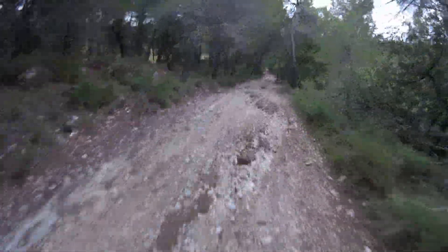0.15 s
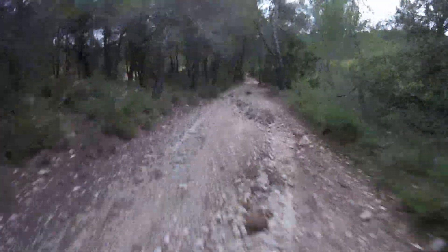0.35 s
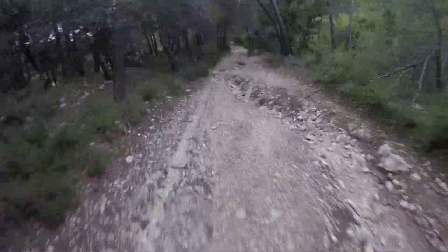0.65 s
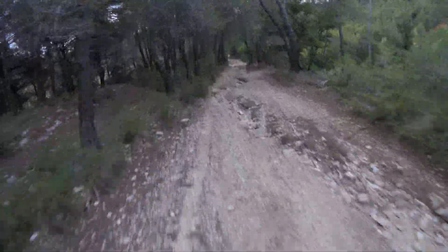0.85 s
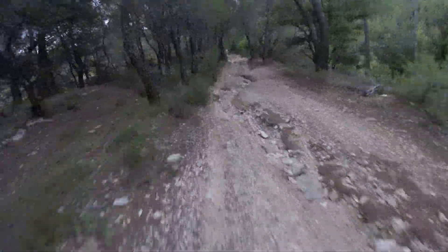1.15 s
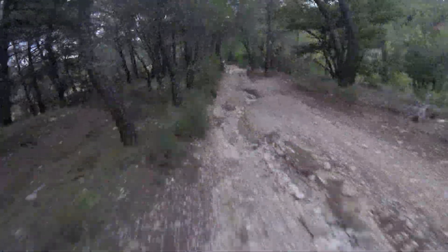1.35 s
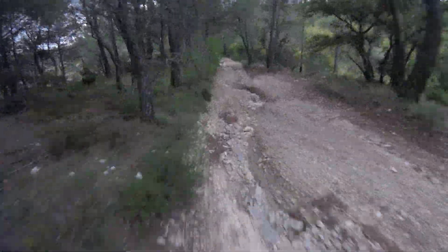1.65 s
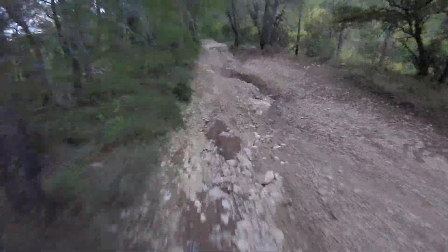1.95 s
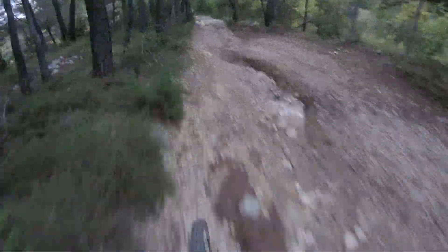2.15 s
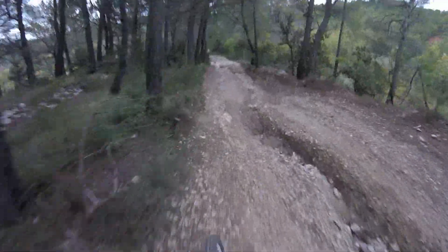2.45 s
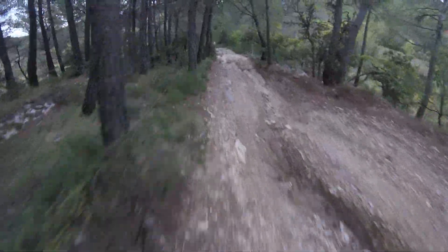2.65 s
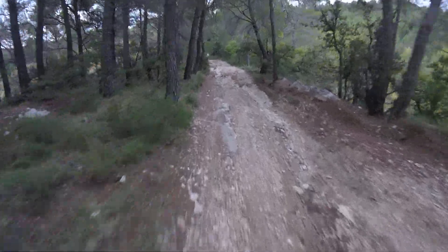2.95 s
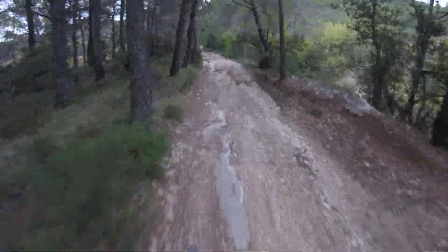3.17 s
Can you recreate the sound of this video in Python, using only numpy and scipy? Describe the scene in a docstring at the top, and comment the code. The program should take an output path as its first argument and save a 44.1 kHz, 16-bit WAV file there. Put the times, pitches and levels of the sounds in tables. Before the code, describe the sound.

Mountain bike tyres rumble quickly over stony dirt, under lumpy low wind buffeting, close and muffled at the rider, outdoors and dry. Stone clacks, gravel crunch and tiny high pebble pings cluster densely at 0.4-0.7 s, then come sparsely. At 2.08-2.14 s a hard double knock rings the bike briefly with rattling parts. The ride drops quieter, a short bright swish passes at 2.9 s, and rumble and wind rebuild until 3.3 s.

```python
"""Wind buffeting and tyre rumble come first: a mountain bike rolls fast down a stony track, heard from a case
on the rider. Filtered random impacts make the rumble, roar, crunch and grit; steadied noise makes the wind.
Stones and pebbles are decaying sines with noise bursts. Just after two seconds a hard double knock excites the
bike's modes and loose parts rattle; the sound drops quieter, then builds again with one short swish."""
import sys
import numpy as np
from scipy import signal
from scipy.fft import rfft, irfft
from scipy.io import wavfile
from scipy.ndimage import uniform_filter1d

SR = 44100
rng = np.random.default_rng(int(sys.argv[2]) if len(sys.argv) > 2 else 0)


def log_audio(samples):
    """Write samples as a 16-bit WAV file to the path given in sys.argv[1]."""
    # one column per channel
    frames = np.atleast_2d(samples).T
    # limit to full scale, then quantise
    limited = np.clip(frames, -1, 1)
    pcm = np.round(limited * 32767).astype(np.int16)
    wavfile.write(sys.argv[1], SR, pcm)


N = 145971
TIME = np.arange(N) / SR  # seconds

# Tyre rumble over time. Each row: time in seconds, level in dB before the trim.
RUMBLE_LEVEL = [(0,-27),(.15,-27.5),(.4,-23.5),(.49,-20.5),(.65,-25.5),(.69,-20.5),(.78,-20.5),(.9,-19.8),(1.2,-22),(1.41,-24.5),(1.47,-21.5),(1.54,-23),(1.84,-22.5),(1.98,-25),(2.04,-18.5),(2.09,-28),(2.17,-35.5),(2.27,-28.5),(2.45,-30),(2.55,-33),(2.64,-27.5),(2.98,-28),(3.31,-22.5)]
# Roar of the tread on the dirt over time. Each row: time in seconds, level in dB before the trim.
ROAR_LEVEL = [(0,-32.5),(.25,-30),(.42,-29.5),(.53,-24.5),(.6,-27.5),(.67,-30),(.86,-29.5),(.94,-34),(1.1,-31),(1.25,-34),(1.45,-31.5),(2.06,-31),(2.12,-39.5),(2.24,-38),(2.4,-41),(2.5,-43.5),(2.69,-41.5),(2.94,-33.5),(3.31,-32.5)]
# Spectrum of the wheels' thuds. Each row: frequency in Hz, relative density in dB per Hz.
RUMBLE_SPECTRUM = [(30,-20),(80,-6.5),(130,0.5),(200,-3.5),(310,-7.5),(450,-14),(700,-21),(1300,-46),(3000,-73.5)]
# Spectrum of the tread's roar, also of scraping stones. Each row: frequency in Hz, relative density in dB per Hz.
ROAR_SPECTRUM = [(200,-17.5),(450,-4.5),(720,-4),(880,0),(1000,-0.5),(1120,-7.5),(1270,-7.5),(1450,-14.5),(1650,-16),(1950,-29),(3000,-36.5),(6000,-75.5)]


def tyres():
    """Roughness excitation: random bumps thud through the wheels while the tread roars over the dirt."""
    bumps = grains(per_s=1500, spread_db=2.5)
    thuds = steady(colour(bumps, RUMBLE_SPECTRUM), size=5000)
    tread_impacts = grains(per_s=5000, spread_db=2.5) * amp(2.0 * wander(rate_hz=62))
    tread = steady(colour(tread_impacts, ROAR_SPECTRUM), size=6000)
    rumble = amp(-0.13) * level(RUMBLE_LEVEL) * thuds
    roar = amp(0.21) * level(ROAR_LEVEL) * tread
    return rumble + roar


# Gravel crunch over time. Each row: time in seconds, level in dB before the trim.
CRUNCH_LEVEL = [(0,-48.5),(.22,-43),(.46,-43),(.55,-37.5),(.62,-41.5),(.70,-45),(.8,-51.5),(.92,-54.5),(1.02,-54),(1.08,-48),(1.42,-48.5),(2.05,-47.5),(2.23,-55),(2.42,-50),(2.66,-53.5),(2.84,-50),(2.96,-48),(3.31,-43.5)]
# Fine grit thrown up by the tyres, over time. Each row: time in seconds, level in dB before the two grit trims.
GRIT_LEVEL = [(0,-59),(.22,-55.5),(.46,-52.5),(.52,-49),(.565,-40),(.6,-51.5),(.69,-51),(.8,-73),(1.2,-60.5),(1.43,-58.5),(1.8,-63.5),(2.06,-54),(2.3,-59),(2.8,-70),(3.0,-60.5),(3.31,-64)]
# Spectrum of cracking gravel and stones. Each row: frequency in Hz, relative density in dB per Hz.
STONE_SPECTRUM = [(300,-11),(900,2.5),(1600,4.5),(2000,-4.5),(2350,1.5),(2700,4.5),(3150,-5.5),(3600,2),(3950,-8),(4400,-20),(5100,-12.5),(6700,-11),(7300,-18),(8100,-24.5),(12000,-24.5),(13500,-42),(15500,-39)]
# Spectrum of grit and pebbles on the bike. Each row: frequency in Hz, relative density in dB per Hz.
PING_SPECTRUM = [(1000,-40),(3000,-19),(3800,4),(4400,-10),(5100,-0.5),(5800,0),(6800,4),(7400,-8.5),(8200,-18.5),(11800,-16),(13200,-30),(15500,-35)]


def gravel():
    """Granular impact noise: clumps crack under the tyres over a fine hiss, and grit patters on the bike."""
    clumps = grains(per_s=2000, spread_db=3.7) * amp(4.3 * wander(rate_hz=49))
    hiss = amp(-7) * rng.standard_normal(N)
    crunch = colour(steady(clumps, size=4000) + hiss, STONE_SPECTRUM)
    grit_impacts = grains(per_s=3500, spread_db=3.5) * amp(5.2 * wander(rate_hz=64))
    grit = colour(steady(grit_impacts, size=4000), PING_SPECTRUM)
    patter = amp(-3) * grit + amp(-3) * chips(count=24)
    return amp(-0.3) * level(CRUNCH_LEVEL) * crunch + level(GRIT_LEVEL) * patter


def chips(count):
    """Size sets pitch: chips of many sizes tick at random times, each size a brief decaying tone."""
    out = np.zeros(N)
    for hz in np.geomspace(2500, 12500, count):
        strikes = grains(per_s=25, spread_db=3.5)
        out += signal.oaconvolve(strikes, tick(hz, t60=.016, rise_s=.0005))[:N]
    return unit(colour(out, PING_SPECTRUM))


# Large stones under the tyres. Each row: start in seconds, clack level in dB (it also sets the scrape),
# clack frequency in Hz, crack level in dB; all levels are before their trims.
STONE_HITS = [(.226,-22,850,-33),(.335,-21,730,-31),(.381,-20,940,-31),(.4435,-28,1100,-28),(.474,-23,1000,-31),(.4833,-13.5,915,-26),(.516,-13.5,1300,-26),(.523,-12,1040,-29),(.538,-18,1000,-26),(.559,-22,900,-26),(.594,-26,1000,-30),(.657,-16,970,-32),(.696,-18,990,-37),(1.052,-23,850,-36),(1.1265,-19,1000,-30.5),(1.147,-19,1020,-44),(1.174,-26,950,-36),(1.271,-25,950,-35),(1.39,-18,940,-39),(1.42,-25,900,-35),(1.563,-27,950,-33),(1.861,-15,980,-38),(2.029,-24,950,-29),(2.365,-25,850,-39),(2.4,-22.5,1000,-38),(2.417,-26,1100,-44),(2.527,-26.5,970,-38),(2.887,-24,915,-39),(2.989,-18,890,-46)]


def stones():
    """Impact sound: each stone gives a hollow clack at its own pitch, a rough scrape and a crack."""
    clacks, scrapes, cracks = np.zeros((3, N))
    for s, clack_db, hz, crack_db in STONE_HITS:
        add(clacks, s, amp(clack_db + 1.5) * tick(hz, t60=.018, rise_s=.0008))
        add(scrapes, s, amp(clack_db - 2.5) * burst(t60=.022, rise_s=.0003))
        add(cracks, s, amp(crack_db + 1) * burst(t60=.027, rise_s=.0003))
    return clacks + colour(scrapes, ROAR_SPECTRUM) + colour(cracks, STONE_SPECTRUM)


# Hard knocks and their rebounds. Each row: start in seconds, crack level in dB, crack T60 in seconds,
# ring strength in dB, ring T60 in seconds before each mode's ratio, most excited frequency in Hz.
KNOCK_HITS = [(2.0839,-17,0.039,-9,0.04,890),(2.0914,-23.5,0.043,-20.5,0.06,890),(2.1065,-34,0.014,-38,.03,900),(2.1154,-22,.016,-18,.016,2900),(2.1272,-25,.02,-46,.02,1000),(2.1323,-10.5,0.011,-6.5,.015,800),(2.1362,-10,0.017,-10,.021,1130),(2.1522,-26,0.023,-15.5,.042,1130),(2.1575,-39,.03,-24,0.05,690),(2.1626,-39,.04,-20.5,0.05,1150),(2.1917,-32,0.045,-29,0.033,1100)]
# Spectrum of the knocks' cracks. Each row: frequency in Hz, relative density in dB per Hz.
KNOCK_SPECTRUM = [(200,-28),(560,-7),(720,-1),(1150,3),(1400,-3),(2200,0),(3000,-2),(4050,1.5),(4700,-9),(5600,-9.5),(6900,-3.5),(7800,-10.5),(8800,-21),(12000,-20),(15500,-26)]
# Fine rattle after the knocks. Each row: time in seconds, level in dB before its random fluctuation.
RATTLE_LEVEL = [(2.08,-55),(2.095,-36),(2.11,-35.5),(2.15,-35.5),(2.2,-43),(2.23,-69)]
# Spectrum of the rattle. Each row: frequency in Hz, relative density in dB per Hz.
RATTLE_SPECTRUM = [(600,-22),(1200,9),(4000,3),(4800,-4),(6800,-0.5),(8500,-15),(12000,-8),(14000,-16),(15500,-22)]
# Spectrum of the thin chink. Each row: frequency in Hz, relative density in dB per Hz.
CHINK_SPECTRUM = [(4000,-25),(6000,-6),(9000,-9),(12000,-3),(14000,0),(15500,-3)]


def knocks():
    """Impulsive excitation: hard blows crack and ring briefly; loose parts rattle on, with one thin chink."""
    cracks, rings, chink = np.zeros((3, N))
    for s, crack_db, crack_t60, ring_db, ring_t60, favoured_hz in KNOCK_HITS:
        add(cracks, s, amp(crack_db) * burst(crack_t60, rise_s=.00024))
        add(rings, s, ring(ring_db, ring_t60, favoured_hz))
    add(chink, 2.1092, amp(-21) * burst(t60=.008, rise_s=.0002))
    loose_parts = grains(per_s=9300, spread_db=3) * amp(3.1 * wander(rate_hz=200) - 1.5)
    rattle = level(RATTLE_LEVEL) * colour(loose_parts, RATTLE_SPECTRUM)
    return colour(cracks, KNOCK_SPECTRUM) + rings + rattle + colour(chink, CHINK_SPECTRUM)


# Modes of the bike. Each row: frequency in Hz, level in dB before the blow shapes it, ratio of mode T60 to ring T60.
BIKE_MODES = [(680,-11,1.7),(793,-14,.8),(880,-6,1.5),(985,-12,1.0),(1136,-7,1.3),(1217,-12.5,0.82),(1895,-14,0.93),(2145,-15,1.3),(2770,-14,1.2),(2955,-15,1.0),(3160,-18,1.0),(3720,-16,0.8),(3870,-15,0.98)]
# How much, and how widely, a blow favours the modes near its own frequency
FOCUS_DB, FOCUS_OCTAVES = 8.5, 0.16
# Below this strength a blow loses treble: dB per octave above its own frequency, for each dB
SOFT_DB, DULLING = -7, 0.48


def ring(strength_db, t60, favoured_hz):
    """Modal superposition: where the blow lands decides which modes speak, and soft blows are duller."""
    t = np.arange(SR // 5) / SR
    out = np.zeros(len(t))
    for k, (hz, db, length) in enumerate(BIKE_MODES):
        octaves = np.log2(hz / favoured_hz)
        focus_db = FOCUS_DB * np.exp(-(octaves / FOCUS_OCTAVES) ** 2)
        dull_db = DULLING * min(strength_db - SOFT_DB, 0) * max(octaves, 0)
        sign = (-1) ** (k // 2)  # the polarity flips every two modes
        decay = np.exp(-np.log(1000) * t / (t60 * length))
        out += sign * amp(db + focus_db + dull_db) * decay * np.sin(2 * np.pi * hz * t)
    return amp(strength_db) * out * (1 - np.exp(-t / .00086))


# Pebbles flicked against the frame. Each row: start in seconds, level in dB of both ping and snap, ping frequency in Hz.
PEBBLE_HITS = [(.1695,-38,4130),(.3785,-34,6480),(.4435,-20.5,5650),(.5315,-27,6500),(.5482,-25,6590),(.6784,-34,5720),(.9587,-38,6710),(.9892,-35,6340),(.995,-36,6700),(1.1263,-27,6660),(1.4486,-37,6700),(1.5623,-32,6610),(1.6267,-32,6440),(2.241,-38,6600),(2.3,-40,6600),(3.254,-35,3700)]


def pebbles():
    """Short contact excites high frequencies: each pebble gives a sharp snap and a very short high ping."""
    pings, snaps = np.zeros((2, N))
    for s, db, hz in PEBBLE_HITS:
        add(pings, s, amp(db) * tick(hz, t60=.010, rise_s=.0007))
        add(snaps, s, amp(db) * burst(t60=.016, rise_s=.0005))
    return pings + colour(snaps, PING_SPECTRUM)


# Spectrum of the swish. Each row: frequency in Hz, relative density in dB per Hz.
SWISH_SPECTRUM = [(800,-13),(2000,-1),(3600,3.5),(4500,-1),(6300,0),(8000,-7),(12000,-10),(15000,-20)]


def swish():
    """Friction noise: many tiny impacts swell and fade in a bright scuff, as of brush grazing the bike."""
    swell = np.exp(-abs(TIME - 2.922) / .014)  # centre and time constant in seconds
    return amp(-37) * swell * colour(grains(per_s=5000, spread_db=2), SWISH_SPECTRUM)


# Single strong buffets of wind and track. Each row: centre in seconds, peak level in dB,
# mean flutter frequency in Hz, half-width in seconds where the swell is down to 1/e.
BUFFET_LUMPS = [(.175,-13,60,.03),(.31,-11,36,.045),(.495,-9,40,.035),(.705,-12.5,110,.028),(1.275,-10,42,.035),(1.465,-13,140,.018),(2.805,-16,65,.025),(3.27,-13,130,.025)]
FLUTTER = .3  # rms share by which a buffet's frequency wanders


def buffets():
    """Frequency-modulated pressure pulses: each lump is an unsteady low flutter that swells and passes."""
    out = np.zeros(N)
    for s, db, hz, width_s in BUFFET_LUMPS:
        flutter_hz = hz * (1 + FLUTTER * wander(rate_hz=40))
        turns = rng.random() + np.cumsum(flutter_hz) / SR
        swell = np.exp(-((TIME - s) / width_s) ** 2)
        out += amp(db) * swell * np.sin(2 * np.pi * turns)
    return out


# Wind buffeting over time. Each row: time in seconds, level in dB before the trim.
WIND_LEVEL = [(0,-25),(.2,-20.5),(.33,-18.5),(.44,-22),(.55,-19),(.64,-27),(.72,-19),(.86,-25.5),(.92,-20.5),(1.2,-19),(2.02,-18.5),(2.18,-35),(2.31,-26),(2.76,-25),(2.87,-22),(3.04,-22.5),(3.28,-16.5)]
# Spectrum of the wind. Each row: frequency in Hz, relative density in dB per Hz.
WIND_SPECTRUM = [(10,-12),(22,1.5),(35,-3),(58,0),(85,-3.5),(130,-12.5),(250,-25),(600,-52),(2000,-86)]


def wind():
    """Turbulent pressure fluctuation: lumpy low noise as the air buffets the case."""
    turbulence = steady(colour(rng.standard_normal(N), WIND_SPECTRUM), size=5000)
    return amp(1.0) * level(WIND_LEVEL) * turbulence


def tick(hz, t60, rise_s):
    """Damped oscillation: one pitch, struck and dying away by 60 dB in t60 seconds."""
    t = np.arange(SR // 10) / SR
    decay = np.exp(-np.log(1000) * t / t60)
    return np.sin(2 * np.pi * hz * t) * decay * (1 - np.exp(-t / rise_s))


def burst(t60, rise_s):
    """Exponential decay of noise: a dense run of micro-impacts that dies away."""
    t = np.arange(SR // 5) / SR
    decay = np.exp(-np.log(1000) * t / t60)
    return rng.standard_normal(len(t)) * (1 - np.exp(-t / rise_s)) * decay


def grains(per_s, spread_db):
    """Shot noise: clicks at random times, many small and a few large, scaled to rms 1."""
    sizes = amp(spread_db * np.minimum(rng.exponential(1, N), 4))
    signs = rng.choice([-1, 1], N)
    return unit(sizes * signs * (rng.random(N) < per_s / SR))


def colour(x, tone, size=8192):
    """Minimum-phase filtering: a causal filter of unit energy with the given spectrum."""
    hz, db = np.transpose(tone)
    bins_hz = abs(np.fft.fftfreq(size, 1 / SR)) + 1  # the offset keeps the logarithm finite
    log_gain = np.log(amp(np.interp(np.log(bins_hz), np.log(hz), db)))
    # the Hilbert transform of the log gain supplies the minimum phase
    response = np.exp(np.conj(signal.hilbert(log_gain)))
    taps = np.fft.ifft(response).real[:size // 2]
    return signal.fftconvolve(x, taps / np.linalg.norm(taps))[:N]


def wander(rate_hz):
    """Band-shaped random modulation of rms 1: weak below 10 Hz and rolled off above the rate."""
    hz = np.fft.rfftfreq(N, 1 / SR)
    shape = hz / (hz + 10) / (1 + (hz / rate_hz) ** 2)
    return unit(irfft(rfft(rng.standard_normal(N)) * shape, N))


def steady(x, size):
    """Envelope normalisation: evens out slow swells by the running rms over size samples."""
    return x / np.sqrt(abs(uniform_filter1d(x ** 2, size)) + 1e-12)


def level(curve):
    """Envelope law: gain over time from (seconds, dB) points, straight in dB between them."""
    return amp(np.interp(TIME, *np.transpose(curve)))


def amp(db):
    """Decibel law: amplitude gain from dB."""
    return 10 ** (np.asarray(db) / 20)


def unit(x):
    """Power normalisation: scales to rms 1."""
    return x / np.sqrt(np.mean(x ** 2) + 1e-20)


def add(mix, s, sound):
    """Superposition: mixes a sound in, starting at s seconds."""
    part = mix[max(round(s * SR), 0):][:len(sound)]
    part += sound[:len(part)]


def scene():
    """Superposition of all sources at the rider, in mono."""
    ride = tyres() + gravel() + stones() + knocks() + pebbles() + swish()
    air = buffets() + wind()
    return (ride + air)[None]


def record(dry):
    """Saturation and band limiting: the loudest peaks are rounded off, then the top treble is removed."""
    ceiling = .68  # amplitude that the rounded peaks approach
    limited = dry / (1 + (dry / ceiling) ** 8) ** (1 / 8)
    lowpass = signal.firwin(511, 15600, window=("kaiser", 9), fs=SR)  # cutoff in Hz
    return signal.oaconvolve(limited, lowpass[None], "same")


dry = scene()
out = record(dry)
log_audio(out)
```